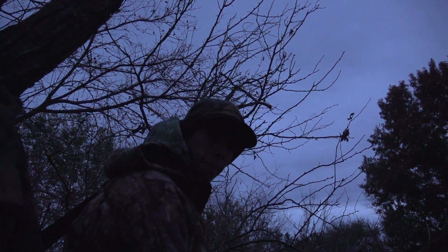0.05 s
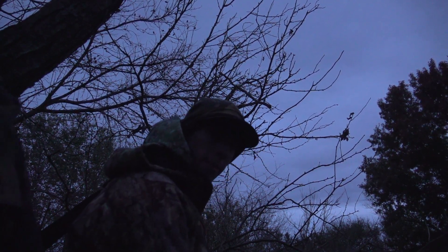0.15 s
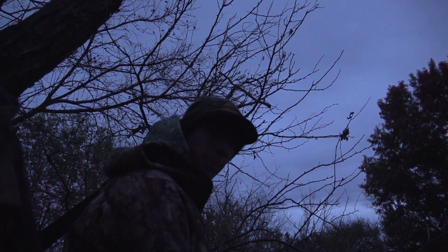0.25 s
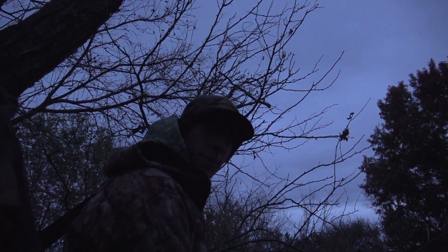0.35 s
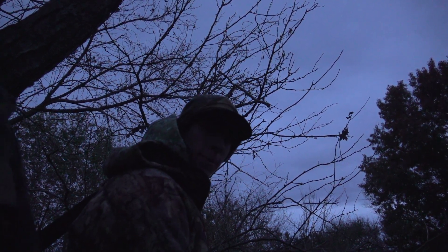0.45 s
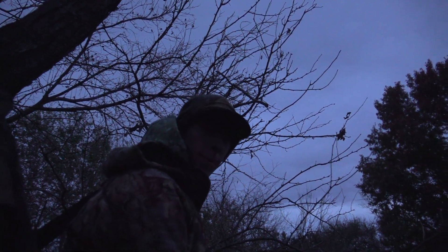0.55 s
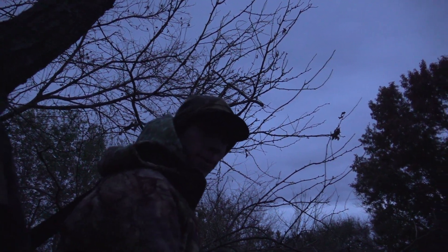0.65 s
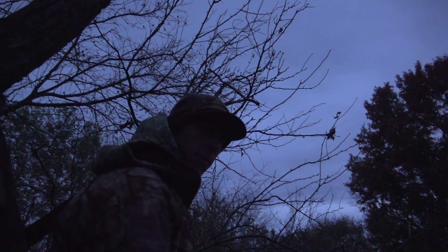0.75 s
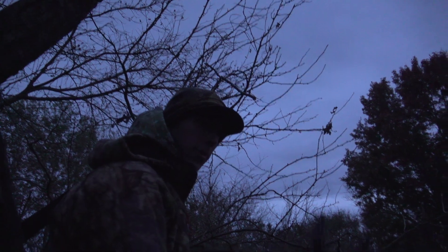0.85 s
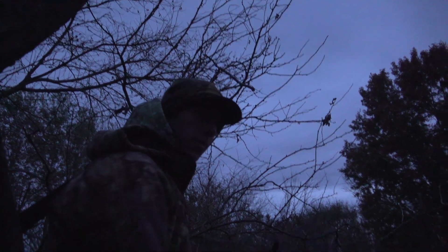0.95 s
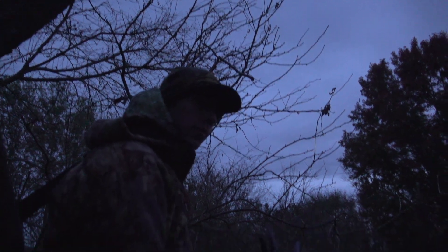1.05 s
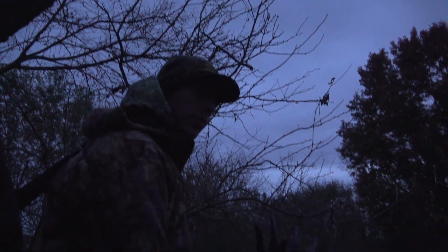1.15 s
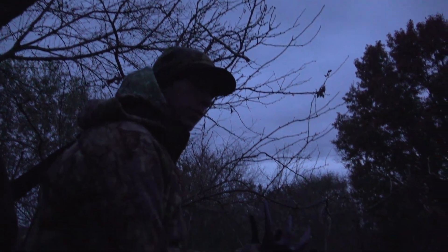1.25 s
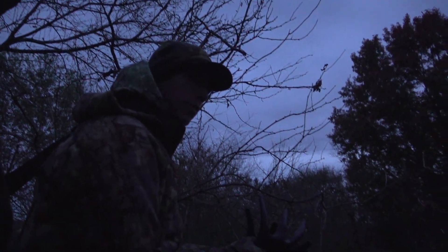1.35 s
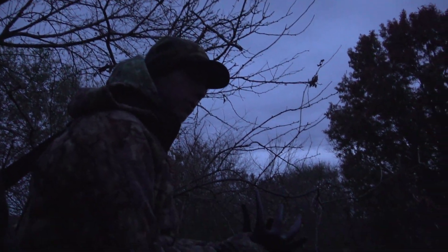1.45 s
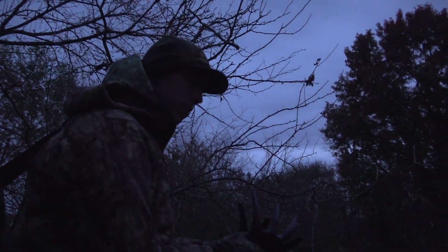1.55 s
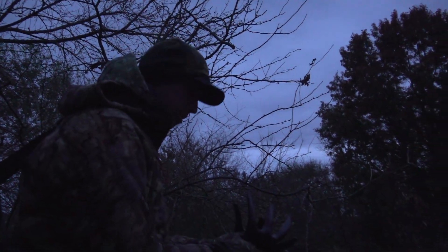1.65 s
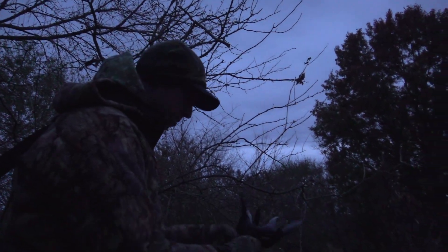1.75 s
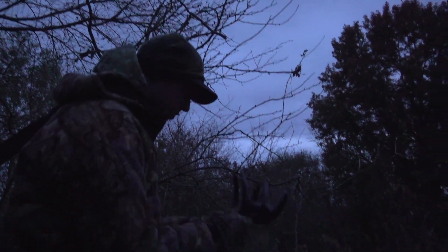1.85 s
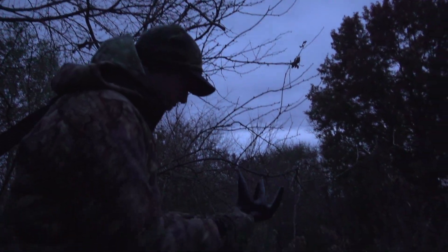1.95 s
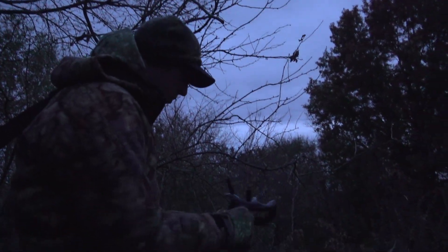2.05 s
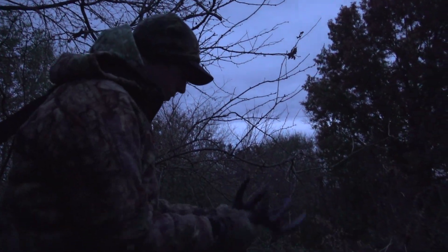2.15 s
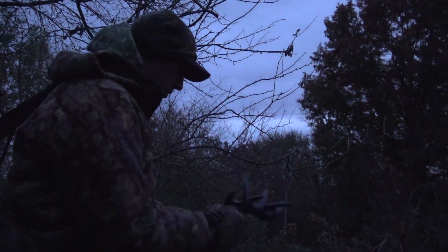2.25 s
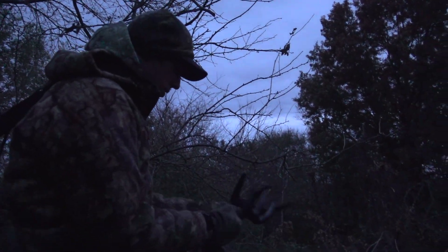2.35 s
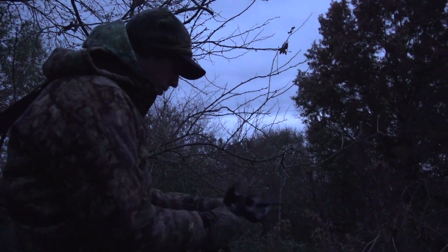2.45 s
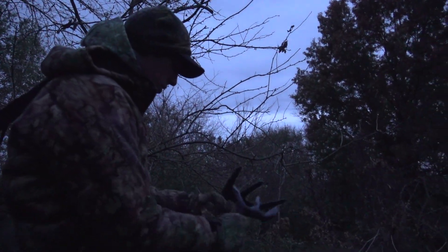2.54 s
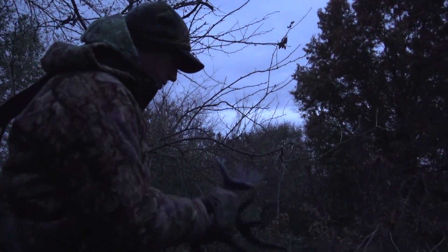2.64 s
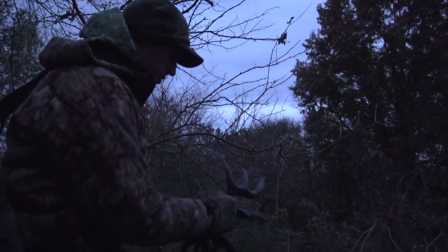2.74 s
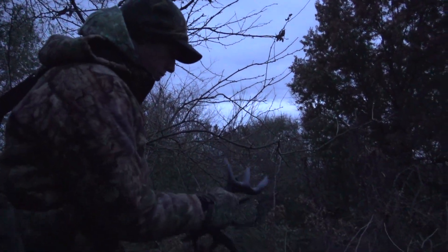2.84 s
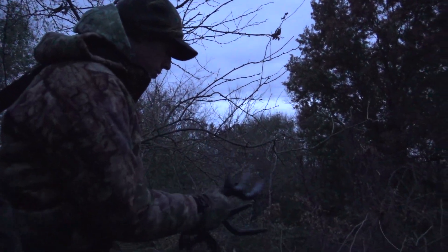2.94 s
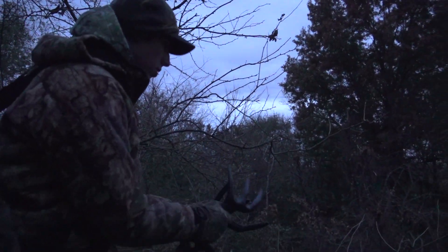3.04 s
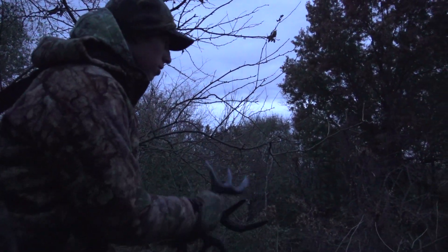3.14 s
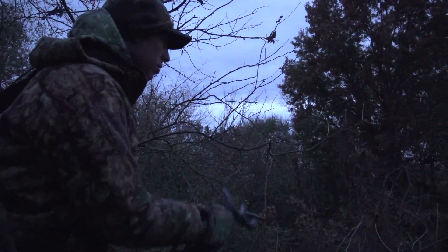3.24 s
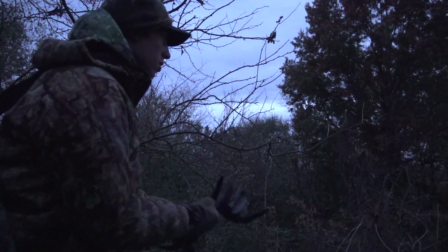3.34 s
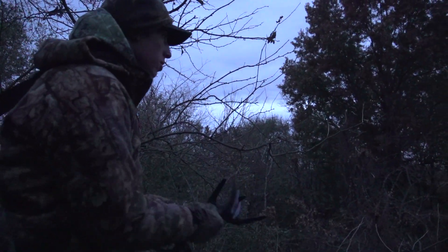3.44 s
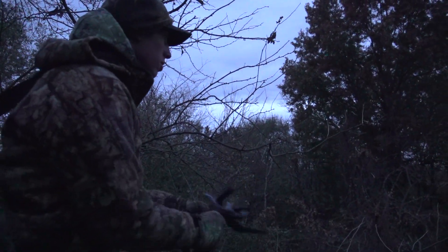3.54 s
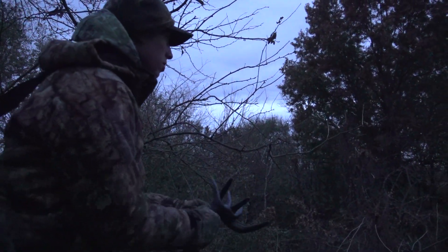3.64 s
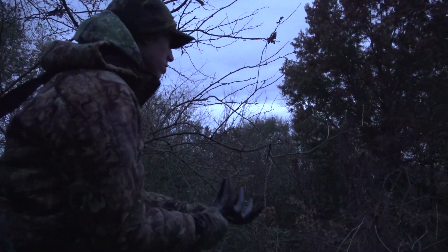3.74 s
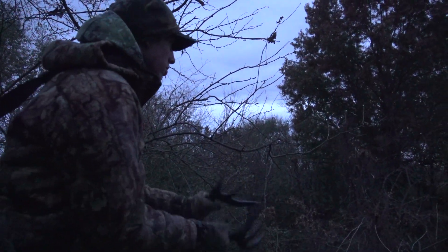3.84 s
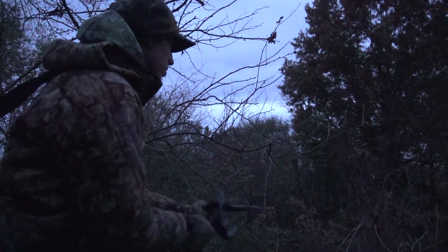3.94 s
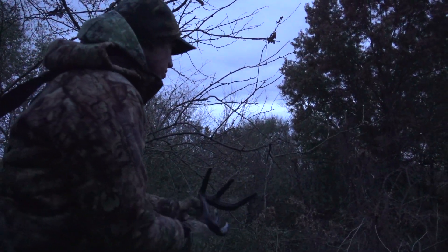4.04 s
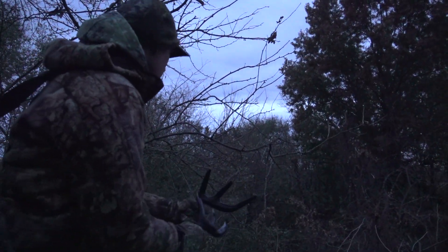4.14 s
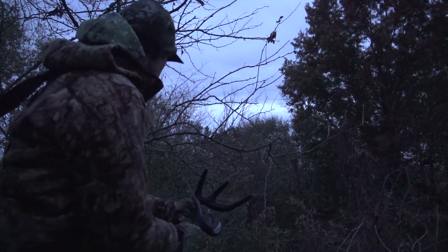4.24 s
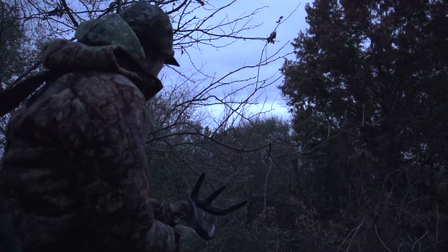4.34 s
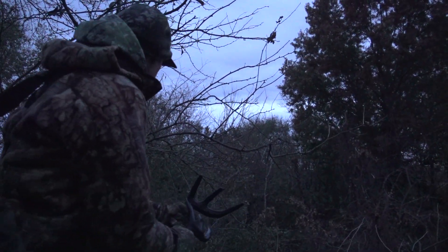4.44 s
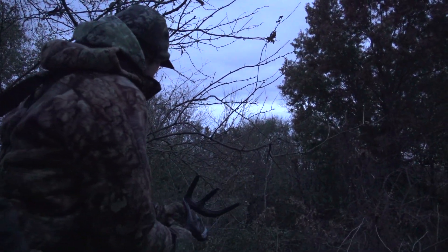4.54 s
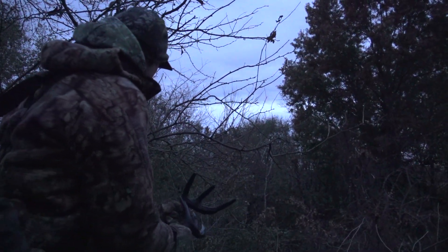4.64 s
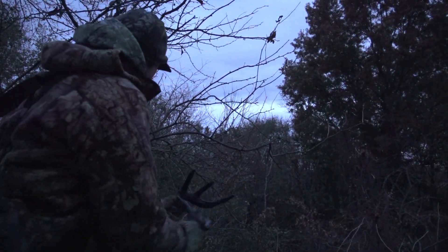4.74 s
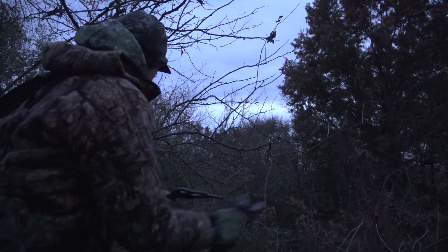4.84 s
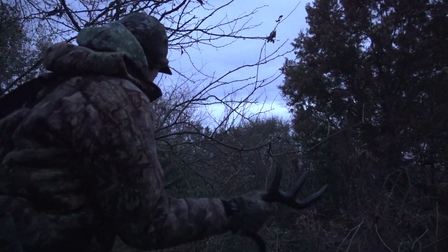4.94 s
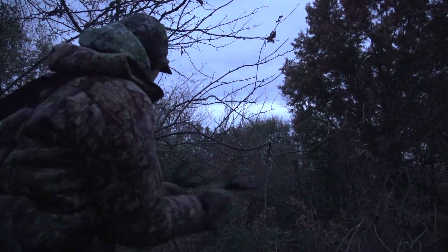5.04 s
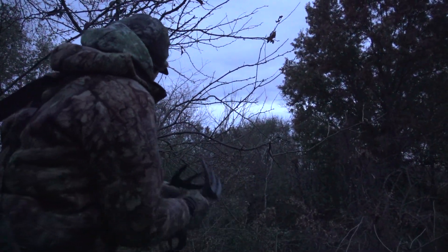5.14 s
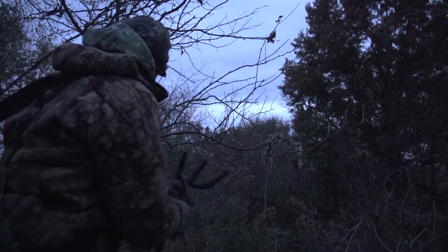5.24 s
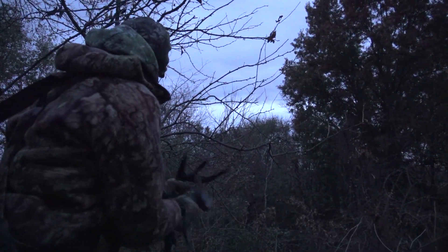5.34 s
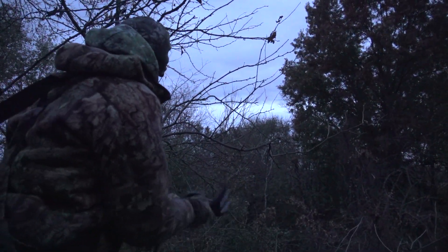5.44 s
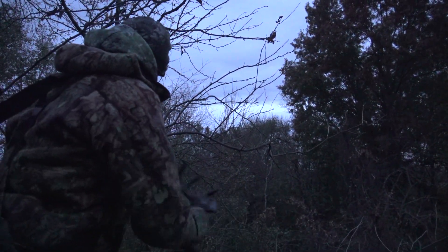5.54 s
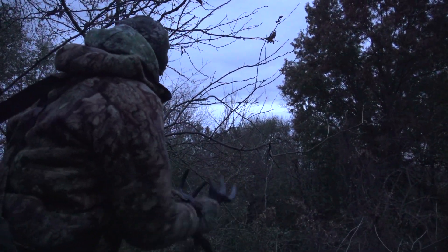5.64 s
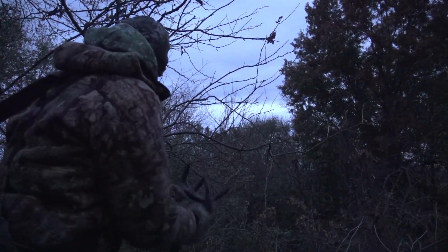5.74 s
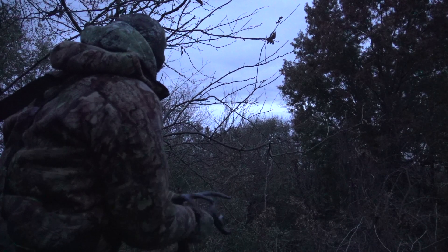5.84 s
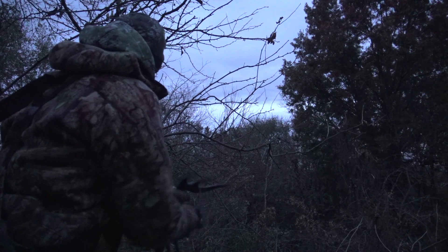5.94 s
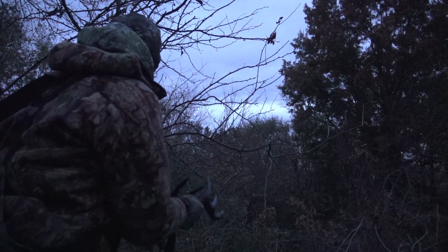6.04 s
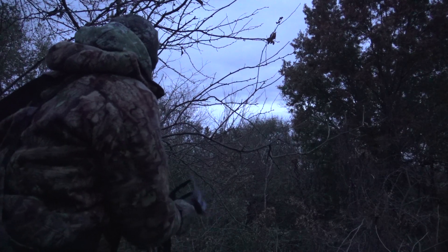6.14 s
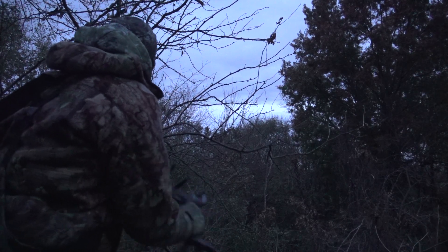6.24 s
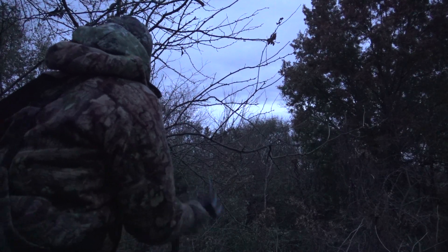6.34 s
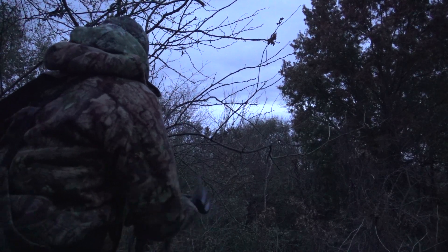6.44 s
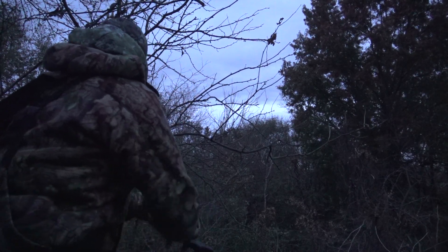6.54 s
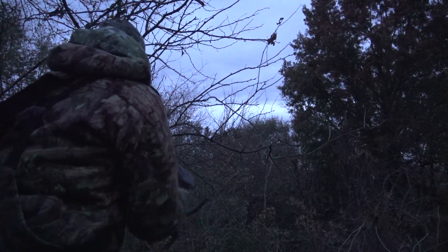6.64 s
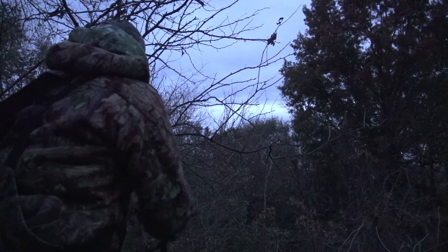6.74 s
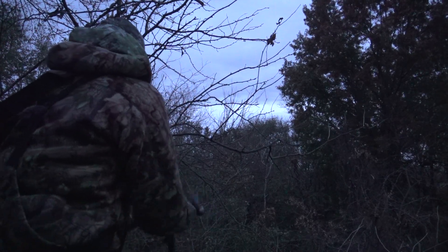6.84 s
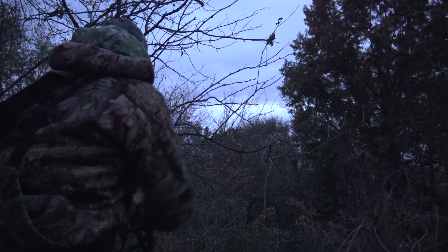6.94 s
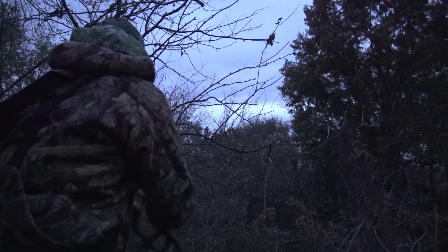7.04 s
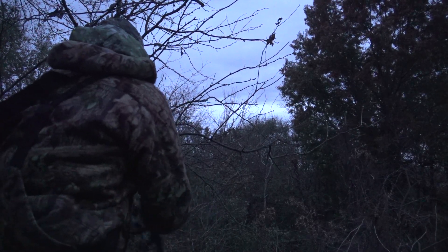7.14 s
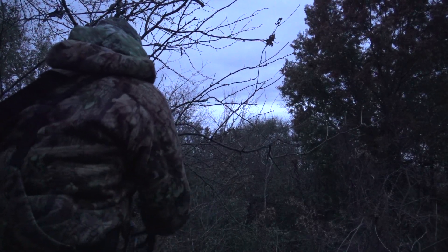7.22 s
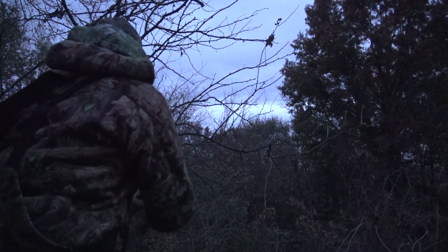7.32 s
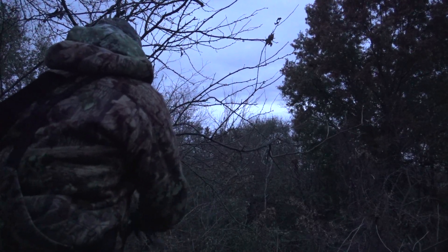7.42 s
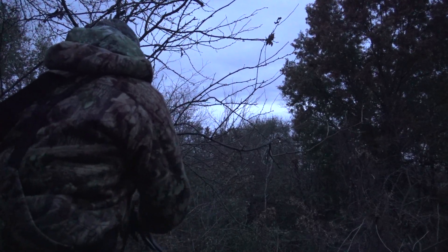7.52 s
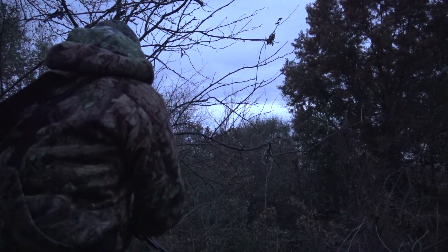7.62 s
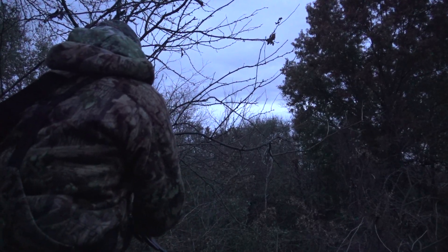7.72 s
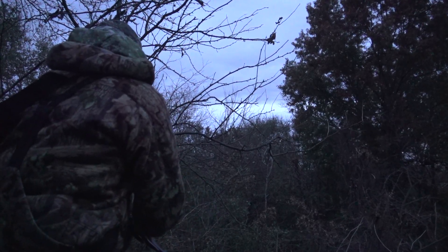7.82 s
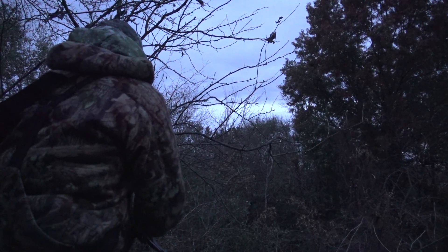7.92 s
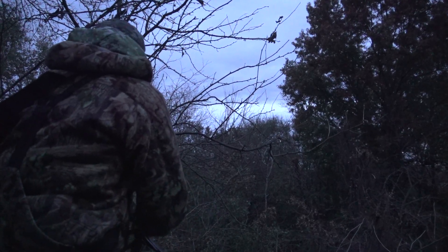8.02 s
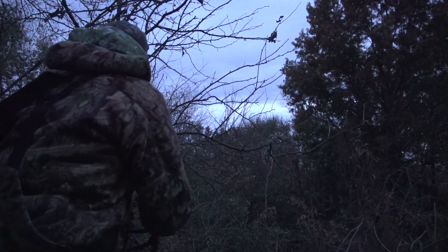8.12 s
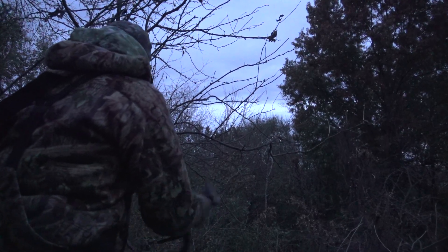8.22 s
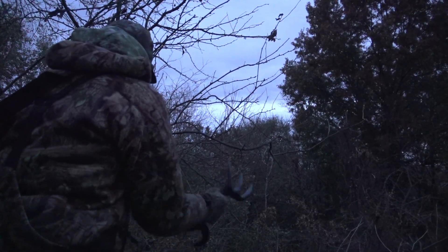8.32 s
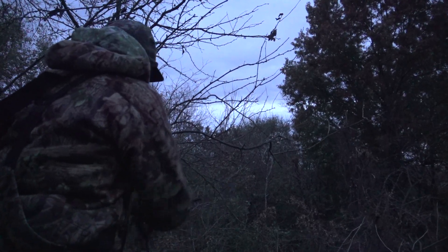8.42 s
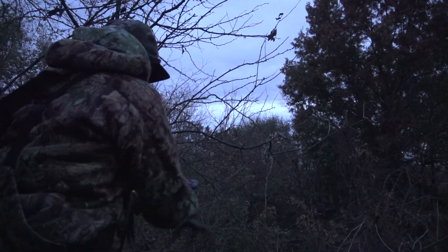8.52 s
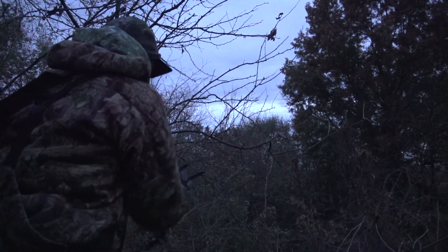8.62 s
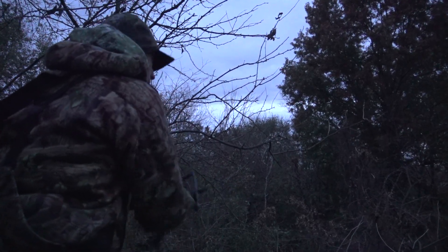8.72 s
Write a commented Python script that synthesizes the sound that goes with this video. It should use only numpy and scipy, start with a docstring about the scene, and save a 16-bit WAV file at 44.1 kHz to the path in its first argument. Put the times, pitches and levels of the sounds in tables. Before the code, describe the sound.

Hard, short, hollow-to-bright antler knocks come in irregular clusters, mixed with brief ridged scrapes and light ticking. The two longest clusters are separated by about a second of near quiet, and a final small group follows another pause. The sound is near and dry, with a faint echo from the woods. Lumpy low wind buffets the stereo microphone over steady hiss and slight dry rustling.

```python
"""Rattling antlers at a wood's edge

A pair of deer antlers, close to the camcorder, knocks and grinds. Each dry clack is a set of short
damped modes with a crunch of contact noise; grinding is ridge clicks exciting the same modes.
The trees return a faint tail, made by convolution with decaying noise. Wind is shaped stereo noise
buffeting the microphone, over a quiet hiss and the stir of dry leaves and clothing."""
import sys
import numpy as np
from scipy import signal
from scipy.fft import rfft, irfft
from scipy.io import wavfile
from scipy.ndimage import uniform_filter1d, minimum_filter1d

SR = 44100
rng = np.random.default_rng(int(sys.argv[2]) if len(sys.argv) > 2 else 0)


def pcm_store(signal):
    """Save signal as 16-bit PCM."""
    levels = np.round(np.clip(np.atleast_2d(signal), -1, 1) * 32767)
    wavfile.write(sys.argv[1], SR, levels.astype(np.int16).T)


N = 387064  # samples


def from_db(db):
    """Decibels to amplitude gain."""
    return 10 ** (np.asarray(db) / 20)


def rms_one(x):
    """Scale to unit power."""
    return x / np.sqrt(np.mean(x ** 2) + 1e-20)


def in_time(rows):
    """Read a time curve at every sample."""
    return np.interp(np.arange(N) / SR, *np.transpose(rows))


def at_hz(points, hz):
    """Read a spectrum on a log-frequency axis."""
    points_hz, values = np.transpose(points)
    return np.interp(np.log(hz + 1e-3), np.log(points_hz), values)


def band(x, edges_hz, kind="band", order=2):
    """Causal Butterworth filter."""
    edges_hz = np.clip(edges_hz, 10, .48 * SR)
    sos = signal.butter(order, edges_hz, kind, fs=SR, output="sos")
    return signal.sosfilt(sos, x + 1e-18)


def drift(knots_per_s):
    """Slow random wander of unit rms, straight between random knots."""
    knots = rng.standard_normal(2000)
    return rms_one(np.interp(np.arange(N) / SR * knots_per_s, np.arange(len(knots)), knots))


def colour(x, spectrum):
    """Shape a steady sound by a spectrum, then scale to unit rms."""
    gain = from_db(at_hz(spectrum, np.fft.rfftfreq(N, 1 / SR)))
    return rms_one(irfft(rfft(x) * gain, N))


def add(out, start_s, sound):
    """Mix a sound in at a time."""
    i = int(np.clip(start_s * SR, 0, N - 1))
    out[i:i + len(sound)] += sound[:N - i]


# modes of the hand-held antlers: pitch_hz [Hz], level_db [dB, relative], t60_s [s, before extra damping]
ANTLER_MODES = [(850, -15.5, 0.045), (968, -2.5, 0.059), (1167, -1.5, 0.044), (1360, 2, 0.034),
                (1720, -2, 0.035), (1935, 1, 0.026), (2235, -3, 0.033), (2510, 2.5, 0.018),
                (2904, 0, 0.019), (3190, -1.5, 0.033), (3574, -1, 0.022), (3928, -0.5, 0.02),
                (4520, -1, 0.02), (5020, 5.5, 0.013), (5992, 7, 0.011), (6540, -1, 0.023),
                (7680, -2.5, 0.0081), (8300, -2.5, 0.01)]
# edges between the beam, fork, tine and tip registers: edge_hz [Hz]
REGISTER_EDGES = [620, 1500, 3000, 5500, 15500]


def clack(ring_hz, shares_db, spread_db, ring_db, grip, damping, crack_db, crack_s, rise_s):
    """One blow: contact point and grip give each mode a new strength and a slightly new pitch."""
    t = np.arange(int(.07 * SR)) / SR
    pitch_hz, mode_db, t60_s = np.transpose(ANTLER_MODES)
    strength, detune, sign = rng.standard_normal((3, len(pitch_hz)))

    # the mode nearest the strongest ring is moved onto it
    struck = np.arange(len(pitch_hz)) == np.argmin(abs(pitch_hz - ring_hz))
    pitch_hz = np.where(struck, ring_hz, pitch_hz * (1 + grip * detune))
    gains = from_db(mode_db + np.where(struck, ring_db, spread_db * strength)) * np.sign(sign)
    decay = from_db(-60 * t * damping / t60_s[:, None])
    modes = gains[:, None] * np.sin(2 * np.pi * pitch_hz[:, None] * t) * decay

    # the rough surfaces crunch for a few milliseconds as they meet
    crack = from_db(crack_db) * rng.standard_normal(len(t)) * np.exp(-t / crack_s)
    attack = 1 - np.exp(-t / rise_s)
    out = 0
    for low, high, share_db in zip(REGISTER_EDGES, REGISTER_EDGES[1:], shares_db):
        in_register = (pitch_hz >= low) & (pitch_hz < high)
        part = modes[in_register].sum(axis=0) + band(crack, 4560, "low")
        part = band(part * attack, [low, high])
        out = out + from_db(share_db) * rms_one(part)
    out = band(out, 6620, "low")
    return out / np.sqrt(np.mean(out[t < .006] ** 2))  # unit rms over the first 6 ms


def knock(ring_hz, beam_db, tip_db, fork_db, fork_follows, fork_ring_db):
    """A blow with its own balance of beam, fork, tine and tip registers."""
    # the fork lies between beam and tines: it moves with the beam, and most when struck itself
    fork_struck = REGISTER_EDGES[1] <= ring_hz < REGISTER_EDGES[2]
    middle_db = fork_db + fork_follows * beam_db + fork_ring_db * fork_struck
    return clack(ring_hz, [beam_db, middle_db, 0, tip_db], spread_db=5, ring_db=10, grip=.06,
                 damping=1.5, crack_db=10.0, crack_s=0.0029, rise_s=0.00014)


KNOCK_DB, CONTACT_S = -11, .0007  # body of a knock below its peak; time for the surfaces to bite
BEAM_COUPLING_DB = 11  # how readily the heavy beam answers, against the tines
TIP_DB, TIP_DB_PER_OCTAVE = -7.5, 2  # higher-ringing knocks land nearer a tip and are thinner
# tine knocks: start_s [s], level_db [dB, nominal peak], pitch_hz [Hz, strongest ring],
# beam_share_db [dB, before the beam coupling]
CLACK_TIMES = [(0.015, -14.5, 1860, -13), (0.024, -11.5, 1290, -6.5), (0.063, -10.5, 2480, -15.5),
               (0.106, -14, 1690, -13), (0.182, -9.5, 2180, -20), (0.195, -11, 1890, -16),
               (0.208, -1, 1480, -11), (0.217, -12.5, 1300, -6), (0.293, -4, 1400, -15),
               (0.313, -9, 1690, -22), (0.413, -6, 4200, -36), (0.507, -8, 1380, -7),
               (0.542, -11, 2160, -13), (1.138, -11.5, 980, -6), (1.815, -13, 3720, -20),
               (1.876, -5, 3220, -10), (1.883, -2, 1230, -13.5), (1.93, -11.5, 3700, -25),
               (2.081, -8.5, 1410, -15), (2.22, -6, 3370, -20), (2.255, -10, 4700, -22),
               (2.298, -3, 4720, -20), (2.319, -8.5, 970, -12), (2.358, -6.5, 4490, -24),
               (2.386, -7.5, 3780, -17), (2.399, -3.5, 3630, -16), (2.41, 0, 1156, -10),
               (2.488, -15, 3860, -24), (2.504, -1, 4550, -22.5), (2.535, -6, 2360, -16.5),
               (2.589, -5.5, 3580, -32), (2.634, -1.5, 3384, -30), (2.655, -9.5, 3440, -23),
               (2.848, -3, 3650, -18.5), (2.866, -2, 4930, -18), (2.945, -11, 3700, -19),
               (3.186, -11, 3770, -26), (3.198, -7.5, 2570, -11), (3.222, -10, 1060, -8),
               (3.36, 2, 4560, -16.5), (3.376, 4, 1092, -9), (3.389, -3, 1184, -9),
               (3.411, -8.5, 1210, -13), (3.451, -6.5, 3880, -35), (3.513, -9.5, 1360, -13),
               (3.544, -9.5, 3610, -29), (3.56, -7.5, 4730, -27), (3.578, -13.5, 988, -19),
               (3.649, -2.5, 1106, -7), (3.661, -2.5, 1006, -10), (3.676, -7, 966, -2),
               (3.836, -12, 930, -9), (3.848, -2, 981, -14.5), (3.959, -9.5, 4120, -22),
               (3.994, -4.5, 2445, -15), (4.053, -5, 4520, -22.5), (5.303, -4, 3190, -14.5),
               (5.367, -1.5, 2510, -18), (5.411, -2.5, 3130, -23), (5.454, -1, 2200, -24),
               (5.461, -6.5, 5470, -19), (5.478, -1, 4650, -22), (5.533, -8, 2330, -16.5),
               (5.562, -13.5, 4630, -26), (5.63, -4.5, 3700, -30), (5.68, -4.5, 2800, -22),
               (5.805, -5.5, 4770, -17.5), (5.877, -3, 4680, -31), (5.894, -10, 4730, -25),
               (5.951, -11.5, 4070, -28), (6.007, -6.5, 3800, -23), (6.045, -3, 3255, -18),
               (6.052, -4, 1940, -25), (6.137, -10, 1350, -12), (6.217, -11, 1926, -23),
               (6.319, -5, 3285, -16.5), (6.403, -10.5, 4520, -19), (6.423, 1.5, 2690, -21),
               (6.471, -2, 1430, -16), (6.486, -6, 5290, -24), (6.567, -2, 2400, -16),
               (6.582, -2, 2300, -13), (6.627, -9, 4870, -21), (6.638, 0, 3106, -18),
               (6.706, -15.5, 5400, -21), (6.951, -17, 3680, -23), (6.976, -0.5, 2420, -23),
               (6.986, -5, 3210, -22), (7.112, -8.5, 2023, -22), (7.159, -2, 5330, -21),
               (7.205, -12.5, 903, -8.5), (7.381, -13.5, 4870, -18), (7.494, -13, 3250, -23),
               (8.469, -0.5, 3780, -25), (8.487, -4, 1730, -14), (8.508, -7.5, 1890, -16),
               (8.629, -4, 1800, -37)]


def knocks(rebound_db):
    """All the tine knocks, each with a weak rebound a few milliseconds later."""
    out = np.zeros(N)
    rebounds = rng.random((len(CLACK_TIMES), 2))
    for (start_s, level_db, pitch_hz, beam_share_db), (gap, strength) in zip(CLACK_TIMES, rebounds):
        tip_db = TIP_DB + TIP_DB_PER_OCTAVE * np.log2(pitch_hz / REGISTER_EDGES[2])
        sound = knock(pitch_hz, BEAM_COUPLING_DB + beam_share_db, tip_db,
                      fork_db=-1.74, fork_follows=0.36, fork_ring_db=5.5)
        sound = from_db(level_db + KNOCK_DB) * sound
        contact_s = start_s + CONTACT_S
        add(out, contact_s, sound)
        add(out, contact_s + 0.0022 + .004 * gap, from_db(rebound_db) * strength * sound)
    return out


def slips(per_s, size_db, clump_db):
    """Ridges catch and let go: dense uneven clicks in clumps; ridge height limits the largest."""
    chance = rng.random(N)
    size = np.minimum(rng.exponential(1, N), 3)
    sign = rng.choice([-1, 1], N)
    clumps = np.tanh(drift(220))
    return (chance < per_s / SR) * sign * from_db(size_db * size + clump_db * clumps)


STROKE_ATTACK_S, STROKE_SAG_DB = 0.0029, 3  # the push builds at once, then slackens over the stroke
# friction of ridged bone: pitch_hz [Hz], level_db [dB per Hz, relative]
RASP_SPECTRUM = [(1300, 1.5), (2300, 0), (3500, 3.5), (4800, 3.5), (6000, -3.5), (8500, -68), (11000, -60),
                 (15500, -36)]
# grinding strokes, also used by the ticks: start_s [s], length_s [s], level_db [dB, relative]
GRIND_STROKES = [(.01, .15, -35), (0.205, 0.049, -30), (0.346, 0.087, -33.5), (0.473, 0.088, -35),
                 (0.639, 0.09, -32.5), (1, 0.021, -26.5), (1.018, 0.035, -16.5), (1.071, 0.12, -34.5),
                 (1.72, 0.066, -41), (1.776, 0.12, -32), (2.055, 0.028, -29.5), (2.11, 0.019, -28),
                 (2.205, 0.067, -23.5), (2.302, 0.023, -27), (2.381, 0.032, -17), (2.46, 0.15, -27),
                 (2.626, 0.12, -31.5), (2.827, 0.084, -28.5), (3.001, 0.033, -27.5), (3.157, 0.036, -28),
                 (3.275, .05, -30.5), (3.375, 0.026, -18), (3.511, 0.16, -30.5), (3.764, 0.072, -30),
                 (3.937, 0.063, -27.5), (4.013, 0.052, -22.5), (5.115, 0.06, -18.5), (5.282, 0.054, -27.5),
                 (5.417, 0.079, -31), (5.591, .035, -28.5), (5.774, 0.053, -33), (5.847, 0.013, -29),
                 (5.918, 0.052, -26.5), (5.986, 0.035, -24.5), (6.273, .05, -36.5), (6.378, 0.043, -30.5),
                 (6.424, 0.016, -14.5), (6.475, 0.051, -34), (6.587, .05, -34), (6.74, .045, -29),
                 (6.819, 0.024, -31.5), (6.944, 0.031, -25.5), (6.98, 0.028, -20), (7.083, 0.11, -29),
                 (7.343, 0.026, -32.5), (7.422, 0.078, -23.5), (8.457, 0.062, -18), (8.544, 0.087, -30),
                 (8.657, 0.054, -23)]


def grinding(level_db, beam_db, ring_db, spread_db, release_s):
    """Each stroke drags ridges over bone: a rasp, plus the modes that this contact point wakes."""
    friction = slips(per_s=3000, size_db=5.0, clump_db=5.0)
    rasp = band(colour(friction, RASP_SPECTRUM), 1470, "high", order=3)
    pitch_hz, mode_db, t60_s = np.transpose(ANTLER_MODES)
    beam = pitch_hz < REGISTER_EDGES[1]
    keep = from_db(-60 / (t60_s * SR))  # amplitude kept from one sample to the next
    out = np.zeros(N)
    for start_s, length_s, stroke_db in GRIND_STROKES:
        i, length_s = int(max(start_s, 0) * SR), max(length_s, .005)
        span = slice(i, i + int((length_s + 6 * release_s) * SR))
        t = np.arange(len(rasp[span])) / SR

        # the clicks drive one resonator per mode
        strength, detune = rng.standard_normal((2, len(pitch_hz)))
        turn = 2 * np.pi * pitch_hz * (1 + 0.038 * detune) / SR  # radians per sample
        gains = from_db(mode_db + spread_db * strength + at_hz(RASP_SPECTRUM, pitch_hz))
        rings = np.array([
            signal.lfilter([g, 0, -g], [1, -2 * r * np.cos(w), r * r], friction[span] + 1e-18)
            for g, r, w in zip(gains, keep, turn)])

        tines = rms_one(band(rings[~beam].sum(axis=0), 8100, "low", order=4))
        beam_ring = rms_one(band(rings[beam].sum(axis=0), [720, 1600]))
        sound = rms_one(rms_one(rasp[span]) + from_db(ring_db) * tines)
        sound = sound + from_db(beam_db) * beam_ring

        pressure = from_db(stroke_db + level_db - STROKE_SAG_DB * np.minimum(t / length_s, 1))
        attack = 1 - np.exp(-t / STROKE_ATTACK_S)
        release = np.exp(-np.maximum(t - length_s, 0) / release_s)
        add(out, start_s, sound * pressure * attack * release)
    return out


TICKS_PER_S, TICK_DB, TICK_SPREAD_DB = 22, 1.5, 2.5  # rate in a stroke; levels relative to the stroke


def ticks():
    """While the antlers grind, tines touch lightly at random moments and places."""
    out = np.zeros(N)
    for start_s, length_s, level_db in GRIND_STROKES:
        for when, place, size in rng.random((round(TICKS_PER_S * length_s), 3)):
            sound = knock(1500 * 4.3 ** place, beam_db=-8, tip_db=-7.5,
                          fork_db=-3, fork_follows=0.24, fork_ring_db=0)
            tick_db = level_db + TICK_DB + TICK_SPREAD_DB * (2 * size - 1.5)
            add(out, start_s + when * length_s, from_db(tick_db) * sound)
    return out


def woods(x, near_db, near_t60, far_db, far_t60):
    """Body, ground and brush scatter the sound at once; the trunks send back a long faint tail."""
    t = np.arange(int(1.5 * SR)) / SR
    out = 0
    for db, t60_s in ((near_db, near_t60), (far_db, far_t60)):
        mid, side = rng.standard_normal((2, len(t)))
        echoes = mid + 0.68 * side * np.array([[1], [-1]])
        echoes = echoes * from_db(-60 * t / t60_s) * (t > .003)  # nothing in the first 3 ms
        echoes = band(echoes / np.sqrt(np.sum(echoes ** 2) / 2), 4700, "low")
        out = out + from_db(db) * signal.fftconvolve(x[None], echoes, axes=1)[:, :N]
    return out


# left-right likeness of air noise at the two ports: pitch_hz [Hz], likeness [-1 to 1]
PORT_LIKENESS = [(40, 0.56), (110, 0.94), (200, -0.078), (400, -0.39), (750, -0.31), (1300, 0.27),
                 (2400, 0.66), (4500, 0.95), (8100, -0.37), (14000, 0.88)]


def air(spectrum):
    """Stereo noise whose likeness between the channels changes with frequency."""
    alike = np.clip(at_hz(PORT_LIKENESS, np.fft.rfftfreq(N, 1 / SR)), -1, 1)
    mid, side = rfft(rng.standard_normal((2, N)))
    stereo = np.sqrt(1 + alike) * mid + np.sqrt(1 - alike) * side * [[1], [-1]]
    return colour(irfft(stereo, N), spectrum)


# strength of the breeze at the microphone: start_s [s], level_db [dB, before flutter]
BREEZE_LEVEL = [(0, -25.5), (.17, -24.5), (.42, -29), (.85, -28.5), (1.3, -27), (1.7, -34), (2.8, -37.5),
                (3.6, -43.5), (4.5, -42), (5.05, -53), (5.3, -42), (6.9, -39.5), (7.45, -38.5),
                (8.02, -52.5), (8.1, -34), (8.5, -22), (8.62, -33), (8.78, -27.5)]
# puffs on top of the breeze: middle_s [s], length_s [s, nominal], level_db [dB, before flutter]
WIND_PUFFS = [(0.185, 0.068, -27), (0.745, 0.16, -30.5), (1.928, .12, -29), (4.2, .18, -32),
              (5.747, 0.079, -24), (5.91, 0.094, -31), (6.164, 0.26, -27.5), (6.677, 0.31, -32),
              (8.387, .12, -21.5)]


def gusts():
    """Wind strength in dB: the breeze plus the power of bell-shaped puffs."""
    t = np.arange(N) / SR
    power = from_db(in_time(BREEZE_LEVEL)) ** 2
    for middle_s, length_s, level_db in WIND_PUFFS:
        power = power + from_db(level_db) ** 2 * np.exp(-(np.pi * (t - middle_s) / length_s) ** 2)
    return 10 * np.log10(power)


# wind rumble at the microphone: pitch_hz [Hz], level_db [dB per Hz, relative]
BUFFET_SPECTRUM = [(25, -33), (60, -14), (120, -9), (220, 4), (380, 4.5), (600, -1.5), (900, -12),
                   (1500, -28), (3000, -60)]


def wind(flutter_db, brighten):
    """Eddies at the two microphone ports make a lumpy, wide rumble; hard puffs are brighter."""
    gust_db = gusts() + flutter_db * drift(35)
    rumble = air(BUFFET_SPECTRUM)
    low = band(rumble, 680, "low", order=1)
    bright_gain = from_db(brighten * (gust_db - gust_db.mean()))
    return from_db(gust_db) * (low + (rumble - low) * bright_gain)


# dry leaves and clothing stirring: start_s [s], level_db [dB, before a random wander]
STIR_LEVEL = [(0, -44), (1.2, -43.5), (1.65, -50), (3, -44), (4.2, -44.5), (4.8, -53), (5.1, -48.5),
              (5.4, -41.5), (7, -39), (7.7, -43), (8.4, -46), (8.78, -35)]
# steady background: pitch_hz [Hz], level_db [dB per Hz, relative]
HISS_SPECTRUM = [(30, -9.5), (90, 5), (300, 8), (800, -3), (2000, -8.5), (4800, -11.5), (7000, -20.5),
                 (9000, -22), (11000, -37), (13500, -29.5), (16000, -54)]


def stirring():
    """Dry leaves and clothing: high-passed air noise whose level wanders."""
    level_db = in_time(STIR_LEVEL) + 1.8 * drift(12)
    return from_db(level_db) * rms_one(band(air(HISS_SPECTRUM), 900, "high"))


def hiss():
    """Steady quiet stereo noise under everything."""
    return from_db(-47.5) * air(HISS_SPECTRUM)


def scene():
    """Antlers just ahead of the microphone, in wind and woodland hiss."""
    antlers = knocks(rebound_db=-8.5) + ticks()
    antlers = antlers + grinding(level_db=-0.3, beam_db=-7.5, ring_db=-2.5, spread_db=6, release_s=0.019)
    # the two ports hear the beam's knock and the top treble slightly out of phase
    side = from_db(-15) * band(antlers, [400, 1000]) + from_db(-10.5) * band(antlers, [7500, 10000])
    side = signal.hilbert(side).imag * [[1], [-1]]
    space = woods(antlers, near_db=-10.5, near_t60=0.07, far_db=-18, far_t60=0.99)
    background = hiss() + stirring()
    return antlers + side + space + wind(flutter_db=2.5, brighten=0.073) + background


LIMIT_DB, LIMIT_RELEASE_DB_PER_S = -0.5, 160  # the camcorder's peak limiter
LIMIT_AHEAD_S = .001  # half-width of the look-ahead and smoothing windows


def limiter(x):
    """Turn the level down just ahead of the hardest hits and let it recover."""
    recovered_db = LIMIT_RELEASE_DB_PER_S * np.arange(N) / SR
    over_db = np.maximum(20 * np.log10(abs(x).max(axis=0) + 1e-9) - LIMIT_DB, 0)
    cut_db = np.maximum.accumulate(over_db + recovered_db) - recovered_db
    width = 2 * int(LIMIT_AHEAD_S * SR) + 1
    return x * from_db(uniform_filter1d(minimum_filter1d(-cut_db, width), width))


CUTOFF_HZ = 15700  # top of the camcorder's range


def record(dry):
    """The tallest peaks are limited and rounded, and the top is cut."""
    held = limiter(dry)
    rounded = held / (1 + (abs(held) / .9) ** 8) ** (1 / 8)
    steep_cut = signal.ellip(10, .2, 80, CUTOFF_HZ, fs=SR, output="sos")
    return signal.sosfilt(steep_cut, rounded)


dry = scene()
out = record(dry)
pcm_store(out)
```